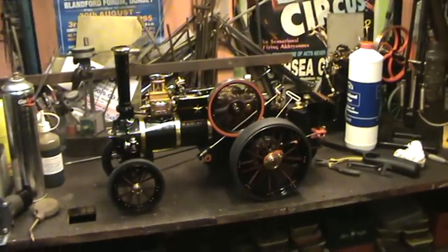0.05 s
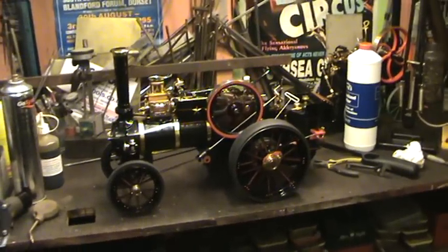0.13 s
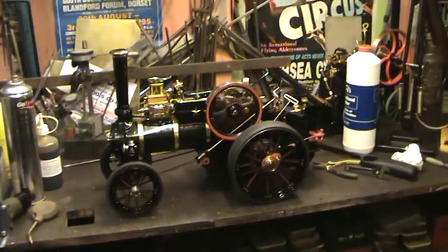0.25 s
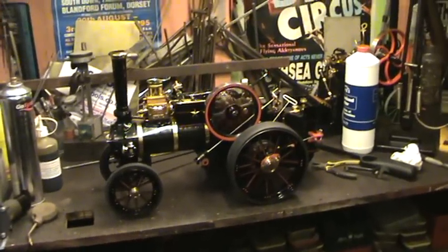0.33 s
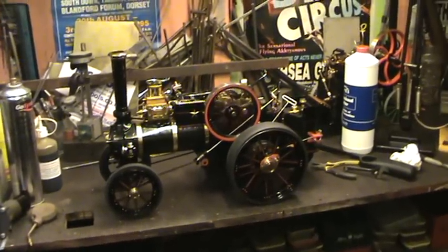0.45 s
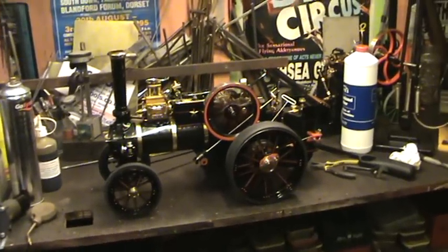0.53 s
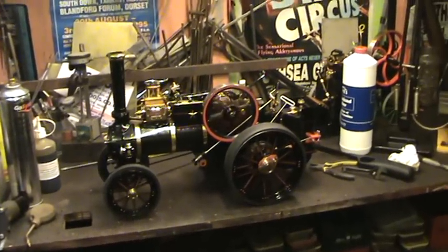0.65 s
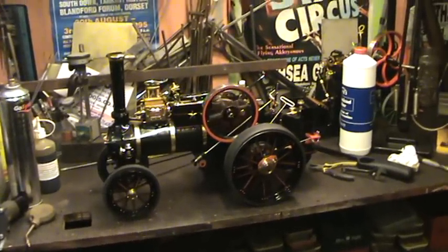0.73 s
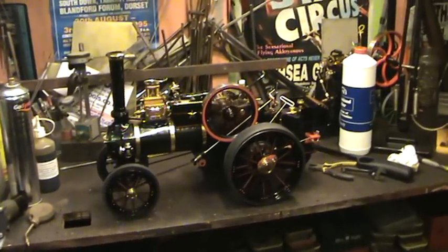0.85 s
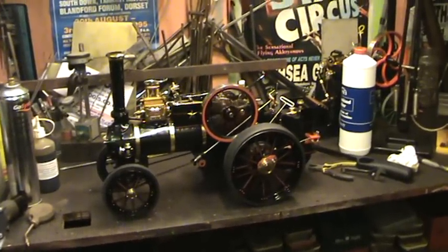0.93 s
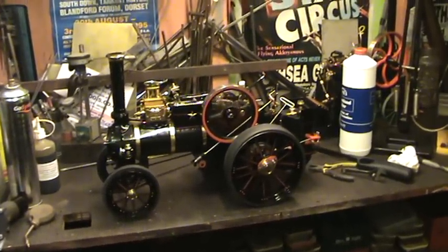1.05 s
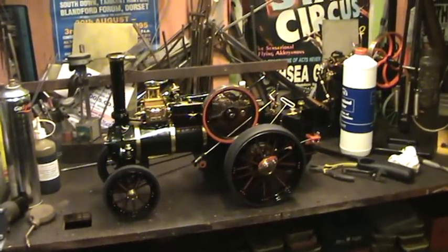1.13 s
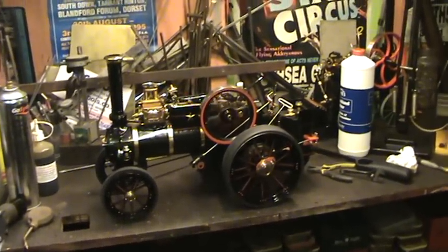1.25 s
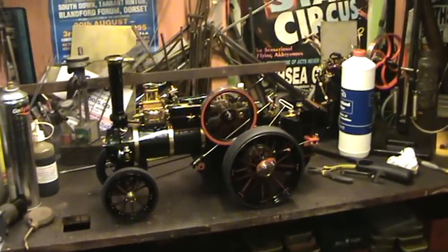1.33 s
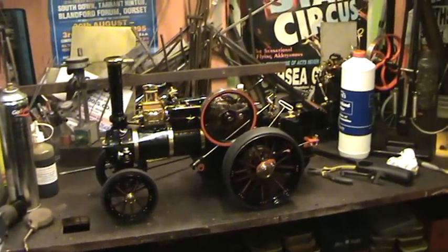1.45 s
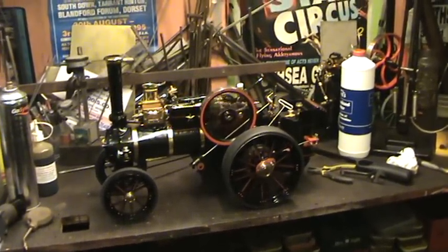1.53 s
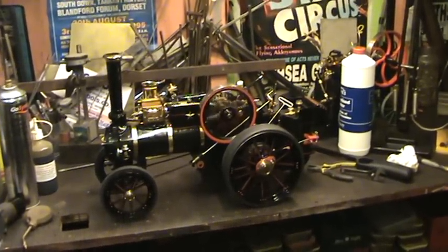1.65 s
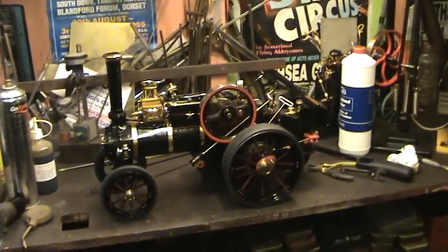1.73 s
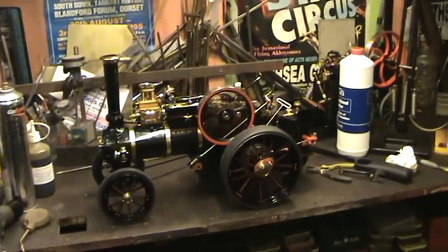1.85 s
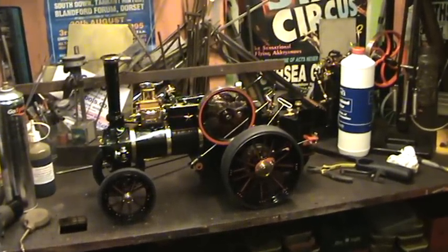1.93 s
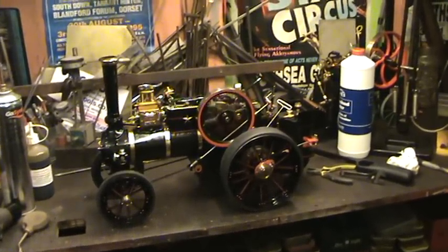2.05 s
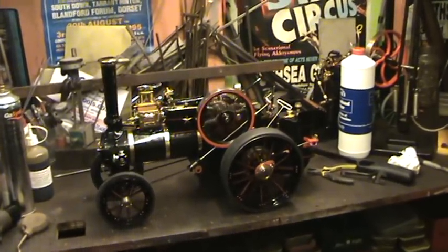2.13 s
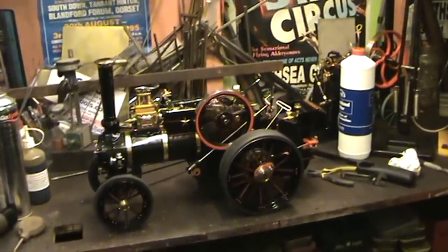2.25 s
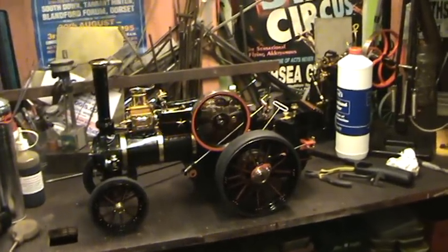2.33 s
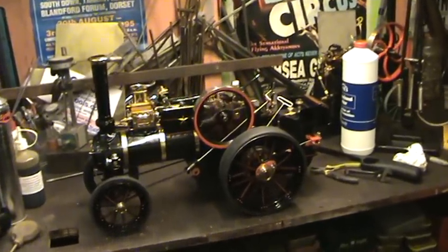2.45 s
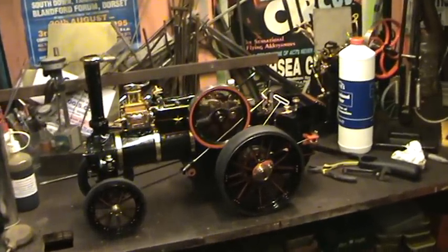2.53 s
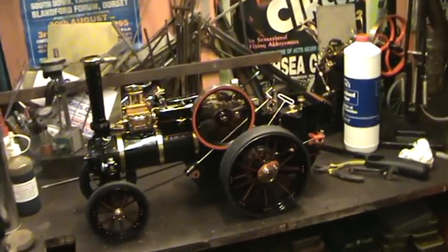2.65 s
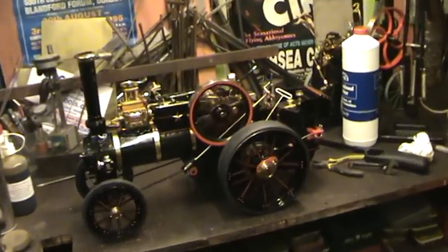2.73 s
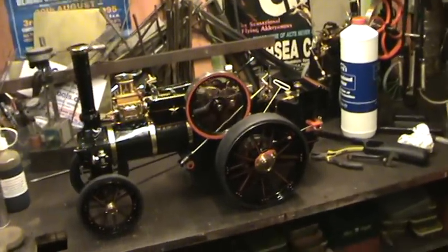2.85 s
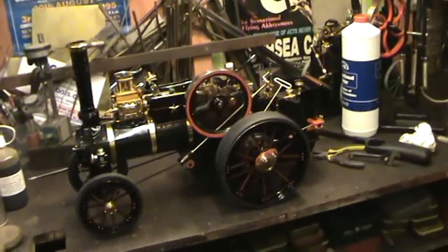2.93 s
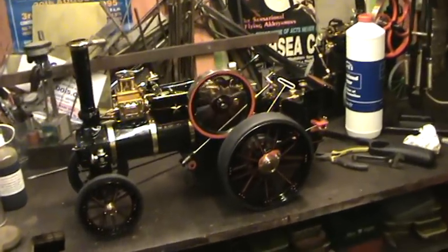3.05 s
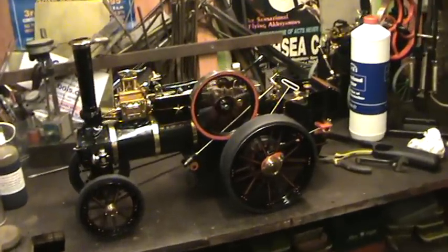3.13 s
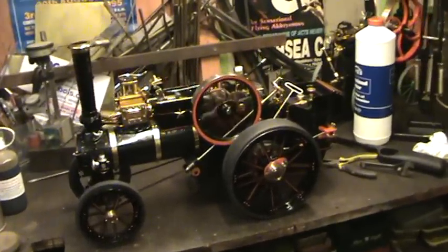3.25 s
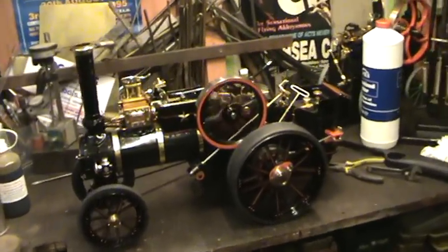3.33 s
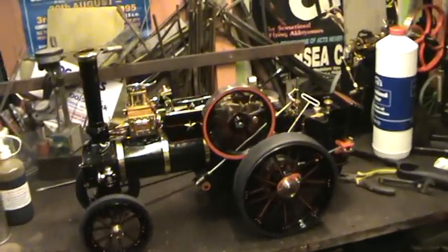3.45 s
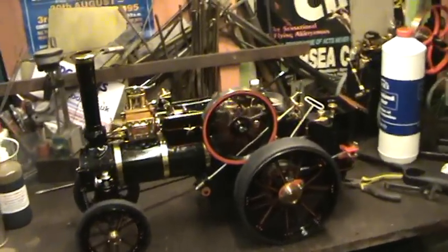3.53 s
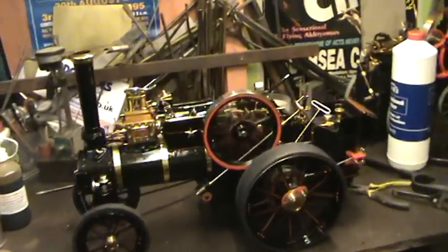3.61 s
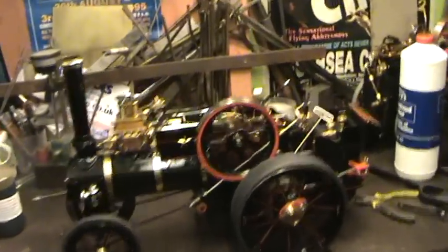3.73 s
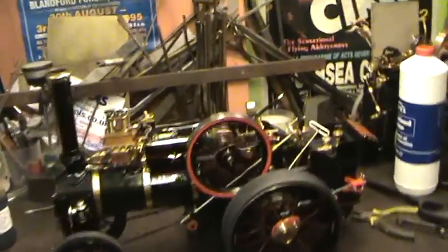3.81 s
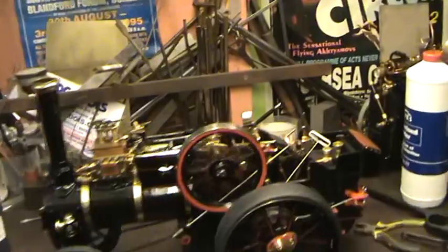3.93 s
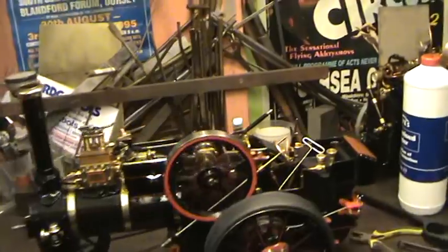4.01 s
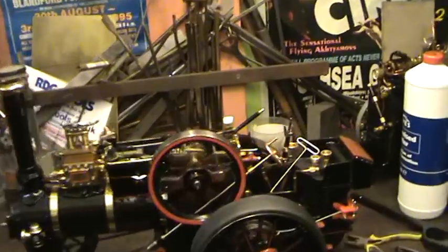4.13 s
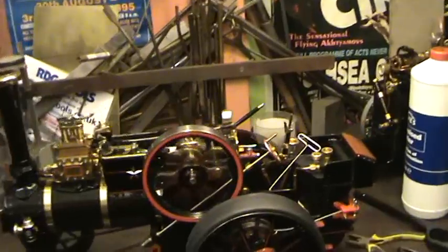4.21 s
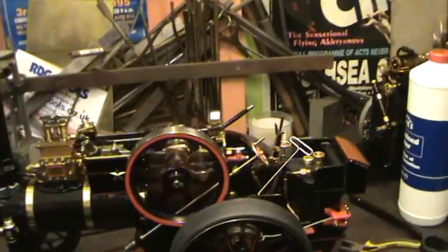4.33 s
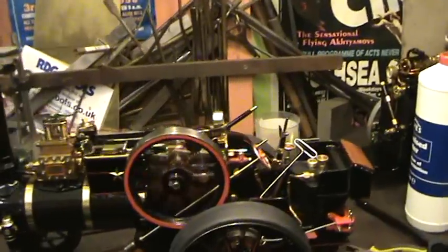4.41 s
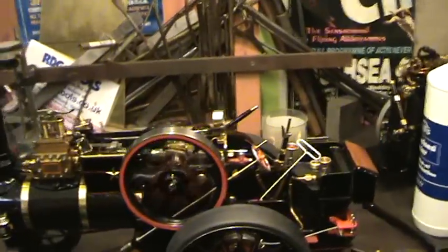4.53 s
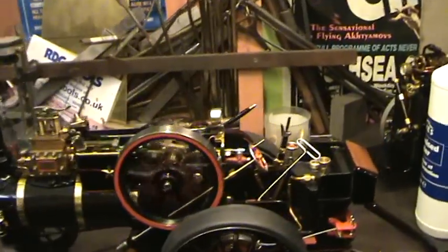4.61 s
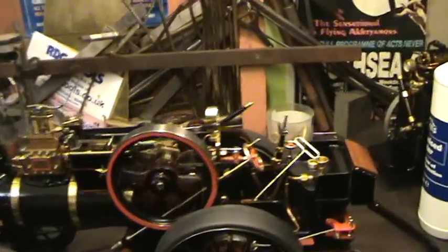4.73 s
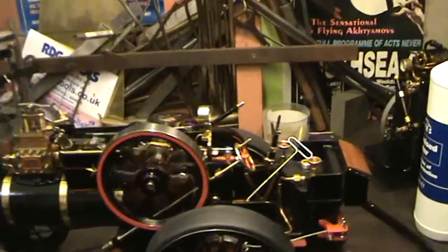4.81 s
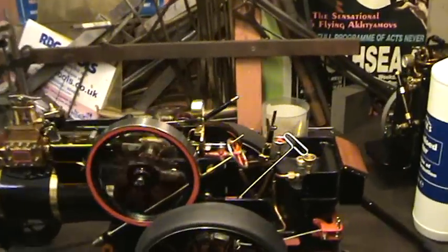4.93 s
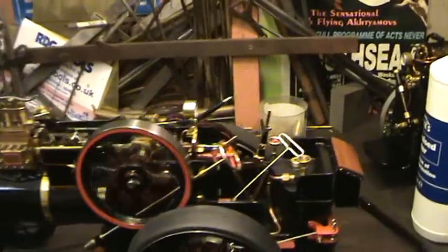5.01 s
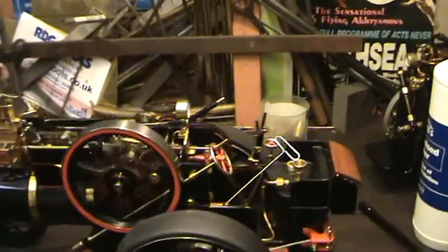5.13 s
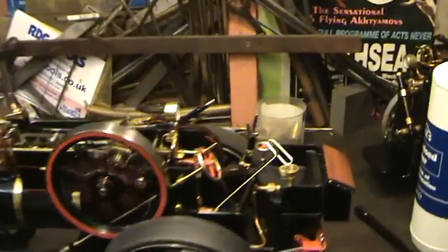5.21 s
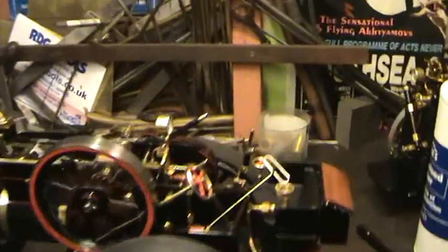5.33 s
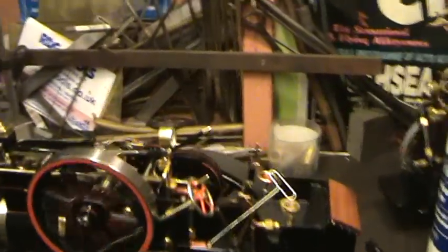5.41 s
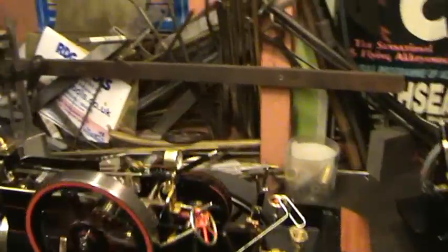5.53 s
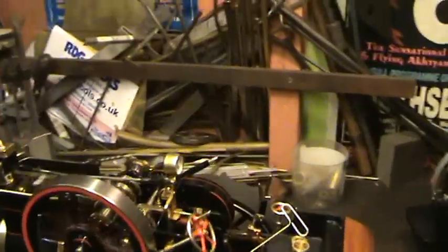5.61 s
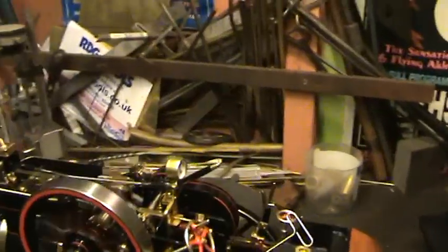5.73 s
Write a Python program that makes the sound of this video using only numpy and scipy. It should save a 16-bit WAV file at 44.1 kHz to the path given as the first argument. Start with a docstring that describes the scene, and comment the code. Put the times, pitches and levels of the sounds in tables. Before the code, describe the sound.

A small model steam engine runs on a shed workbench, chuffing and knocking in a rapid, even beat over a steady hiss.

```python
"""A model steam traction engine ticks over on a shed workbench, about six crank turns a second.
At both stroke ends the rod knocks frame and bench, the engine rocks, and exhaust chuffs up the chimney.
Steam hisses from the boiler fittings and whistles past the rod gland twice a turn, over a low drone.
Later the gland groans, and a faint ring and a thin note in the hiss come and go.
The microphone moves closer: the beat grows louder, drier and more even."""
import sys
import numpy as np
from scipy import signal
from scipy.fft import rfft, irfft
from scipy.io import wavfile

SR = 44100
rng = np.random.default_rng(int(sys.argv[2]) if len(sys.argv) > 2 else 0)


def unload_audio(sound):
    """Save the sound as a 16-bit wav file, at the path given as the first command line argument."""
    columns = np.transpose(np.atleast_2d(sound))
    # keep every value between -1 and 1, then stretch to whole-number steps
    steps = np.round(np.clip(columns, -1, 1) * 32767)
    wavfile.write(sys.argv[1], SR, steps.astype(np.int16))


N = 254456
TIME = np.arange(N) / SR
FREQ = np.fft.rfftfreq(N, 1 / SR)
RETURN_KNOCK_S, OUT_CHUFF_S, RETURN_CHUFF_S = .078, .0195, .096  # after the out-stroke knock

# microphone approach (time [s], nearness [0-1])
NEARNESS = [(0, 0.04), (2.1, 0.1), (3.0, 0.28), (4.0, 0.66), (5.0, .9), (5.77, 1)]
# crank speed (time [s], rate [turns/s])
CRANK_SPEED = [(0.0, 6.136), (0.85, 6.202), (1.1, 6.081), (1.8, 6.255), (2.8, 6.219), (3.3, 6.308),
               (3.8, 6.285), (4.55, 5.989), (5.77, 6.221)]
# stroke strength (time [s], knock [dB], chuff [dB])
STROKE_LEVELS = [(0, -38.5, -36.5), (1.6, -35.5, -34), (2.4, -33, -32), (3.2, -27.5, -30), (4.2, -27, -28),
                 (5.77, -25.5, -27.5)]
# frame resonances (frequency [Hz], width [Hz], gain [dB])
FRAME_MODES = [(267, 60, -2), (310.3, 180, 1), (361.4, 70, -5), (669, 140, -13), (1389, 110, -8.5)]
# steam from the fittings (time [s], hiss [dB], jet [dB])
STEAM_LEVELS = [(0, -28.5, -27.5), (1.65, -25.9, -26), (2.2, -26.5, -26.5), (2.4, -26, -25),
                (2.7, -25, -24.5), (2.9, -25, -26.6), (3.3, -25.5, -22), (3.55, -25, -25.5),
                (3.95, -24.5, -25), (4.6, -24, -26.5), (5.0, -24.5, -25), (5.45, -24.5, -23),
                (5.77, -24.5, -23)]
# broad hiss (frequency [Hz], relative density [dB])
HISS_SPECTRUM = [(300, -14), (1150, -16.5), (1400, -13.5), (1900, -11.5), (3000, -7.5), (3900, -2),
                 (4900, -2.5), (5600, -1.5), (6300, -0.5), (7300, -0.5), (8300, -3), (10000, -3.5),
                 (13000, -19.5)]
# bright jet (frequency [Hz], relative density [dB])
JET_SPECTRUM = [(6000, -22.5), (8200, -12.5), (9250, 2.5), (10100, 1.5), (11000, -4.5), (12000, -12.5),
                (13400, -32), (14400, -37), (15600, -15)]
# narrow ringing peaks in the hiss, strongest from afar (frequency [Hz], width [Hz], gain [dB])
HISS_PEAKS = [(3990, 63, 2), (4420, 60, 5), (5474, 140, 8), (5886, 210, 3.5), (9640, 105, 7.5),
              (9920, 82, -6), (10410, 106, 9.5), (11900, 82, -3)]
# cylinder block leak (frequency [Hz], width [Hz], gain [dB])
BLOCK_MODES = [(3190, 500, -2.5), (3860, 720, 1), (5585, 410, 4.5), (6380, 500, -2)]
# stereo width of the hiss (frequency [Hz], side over mid [dB])
HISS_WIDTH = [(1000, -10.5), (5000, -16), (8000, -16), (9500, -11.5), (10800, -2.5), (12000, 6), (13500, 5),
              (14300, -1), (15200, -25)]
# gland whistle (time [s], level [dB])
GLAND_LEVEL = [(0, -38), (1.3, -37), (2.2, -36.5), (3.0, -33), (3.55, -30.5), (3.9, -40.5), (4.5, -32.5),
               (5.2, -35), (5.77, -39.5)]
# gland leak over one turn (crank phase [turns], level [dB])
GLAND_CYCLE = [(0, -2.5), (.14, -1), (.25, -11.5), (.32, -7.5), (.44, -1.5), (.56, -2), (.68, -14),
               (.82, -11.5), (1, -3.5)]
# upper whistle tones (frequency [Hz], width [Hz], gain [dB])
GLAND_MODES = [(4023, 69, -2), (4440, 52, 0)]
# gland catching and squeaking (peak time [s], length [s], boost [dB])
GLAND_SQUEAKS = [(1.368, 0.049, 6), (3.61, .08, 2), (4.425, 0.055, 5.5), (5.18, .06, 6)]
# low drone (time [s], level [dB])
DRONE_LEVEL = [(0.0, -47), (0.09, -40), (0.46, -54), (0.67, -40.5), (0.96, -62), (1.03, -49), (1.24, -48),
               (1.3, -63), (1.54, -47), (1.85, -62), (2.59, -50), (2.81, -64), (3.23, -49), (3.91, -68),
               (4.06, -50), (5.05, -55), (5.77, -47)]
# chimney resonances (frequency [Hz], width [Hz], gain [dB])
CHIMNEY_MODES = [(668.6, 69, 6), (762.7, 103, 4.5), (867, 110, 3), (1399, 180, 1), (1630, 220, -6.5),
                 (2060, 610, -6.5), (2404, 220, 2)]
# first spit of a chuff (frequency [Hz], width [Hz], gain [dB])
SPIT_MODES = [(1400, 117, -2.5), (1633, 295, -1.5), (2104, 530, -5.5)]
# shed background (frequency [Hz], relative density [dB])
SHED_SPECTRUM = [(20, -20), (60, -4), (100, 3), (180, -2.5), (350, 7.5), (520, -11), (800, 2.5),
                 (1100, -33), (3000, -45)]
# gland groan (peak time [s], length [s], level [dB])
GROAN_SWELLS = [(3.1, 2, -44.5)]
# faint ring (peak time [s], length [s], level [dB])
RING_SWELLS = [(2.57, 0.37, -50), (3.81, .42, -40.5)]
# thin note in the hiss (peak time [s], length [s], level [dB])
SINGING_SWELLS = [(2.62, 0.44, -33), (3.3, .4, -34), (5.2, .3, -33)]
# microphone mismatch (frequency [Hz], left minus right [dB])
MIC_BALANCE = [(120, -0.5), (400, 0.9), (2000, 0.6), (4500, 0.5), (8500, -0.9), (12500, -0.5)]


def undb(db):
    """Decibels to gain."""
    return 10 ** (np.asarray(db) / 20)


def unit(x):
    """Scale to rms 1."""
    return x / np.sqrt(np.mean(x ** 2))


def white():
    """White noise, variance 1."""
    return rng.standard_normal(N)


def curve(rows, column=1):
    """Table column, linear in time."""
    rows = np.array(rows)
    return np.interp(TIME, rows[:, 0], rows[:, column])


def swells(rows):
    """Smooth humps from (peak time [s], length [s], height)."""
    return sum(height * np.cos(np.pi * np.clip((TIME - peak_s) / length_s, -.5, .5)) ** 2
               for peak_s, length_s, height in rows)


def swell_gain(rows):
    """Humps of gain, heights given in dB."""
    return swells([(peak_s, length_s, undb(db)) for peak_s, length_s, db in rows])


def spectrum_db(points):
    """Table levels joined over log frequency."""
    hz, db = np.transpose(points)
    return np.interp(np.log(FREQ + 1), np.log(hz), db)


def equalize(x, gain_db):
    """Zero-phase gain per frequency bin."""
    return irfft(rfft(x) * undb(gain_db), N)


def noise(points):
    """Coloured noise, rms 1."""
    return unit(equalize(white(), spectrum_db(points)))


def ring(x, hz, width_hz, order):
    """Resonators in series, gain 1 at centre; higher orders swell more slowly."""
    section = np.concatenate(signal.iirpeak(hz, hz / width_hz, fs=SR))
    return signal.sosfilt(np.tile(section, (order, 1)), x + 1e-18)


def resonate(x, modes, order=2):
    """Resonances in parallel."""
    return sum(undb(db) * ring(x, hz, width_hz, order) for hz, width_hz, db in modes)


def noise_band(hz, width_hz):
    """Noise through one resonance, rms 1."""
    return unit(ring(white(), hz, width_hz, order=2))


def convolve(x, response):
    """Causal convolution, cut to N."""
    return signal.fftconvolve(x, response)[:N]


def impulses(times_s, db):
    """Impulse train at given levels."""
    train = np.zeros(N)
    np.add.at(train, np.clip((times_s * SR).astype(int), 0, N - 1), undb(db))
    return train


def strokes(times_s, level_db, scatter_db):
    """One impulse per stroke, scattered about a level curve."""
    stroke_db = np.interp(times_s, TIME, level_db) + scatter_db * rng.standard_normal(len(times_s))
    return impulses(times_s, stroke_db)


def knocks(blow, release, near, frame_db=41, bench_db=56, bench_chuff_db=-5):
    """The rod thumps the frame; the bench rings after each knock and chuff. Close up the frame leads."""
    frame = resonate(blow, FRAME_MODES, order=5)  # oil cushions the blow: slow onset
    bench = ring(blow + undb(bench_chuff_db) * release, hz=326.3, width_hz=59.5, order=4)
    return undb(frame_db + 7.5 * near) * frame + undb(bench_db - 11 * near ** 2) * bench


def rocking(turns_s, near, out_db=15.5, return_db=15, lead_s=.009):
    """Each piston reversal rocks the engine on its wheels: a low thud, earlier close up."""
    out_s = turns_s - lead_s * np.interp(turns_s, TIME, near) ** 2
    reversals = impulses(out_s, out_db) + impulses(out_s + RETURN_KNOCK_S, return_db)
    return ring(reversals, hz=121.2, width_hz=46.6, order=3)


def steam(near, hiss_db=.5, peaks_db=-4, block_db=-4):
    """The fittings leak hiss and a bright jet; close up, ringing peaks fade and a block leak joins."""
    hiss_gain, jet_gain = undb(curve(STEAM_LEVELS)), undb(curve(STEAM_LEVELS, column=2))
    peaks = unit(resonate(white(), HISS_PEAKS)) * undb(peaks_db - 12 * near)
    block = unit(resonate(white(), BLOCK_MODES)) * undb(block_db) * np.sqrt(near)
    hiss = undb(hiss_db) * noise(HISS_SPECTRUM)
    rush = hiss_gain * (hiss + block) + jet_gain * noise(JET_SPECTRUM)
    return reflections(rush, near) + hiss_gain * peaks


def reflections(x, near, count=9, first_s=.002, last_s=.016, travel_s=.000902, gain=.17):
    """Tools and walls comb the hiss; the notches slide as the microphone moves."""
    combed = x.copy()
    oversampled = signal.resample_poly(x, 8, 1)
    for place, slope, polarity in rng.uniform(-1, 1, (count, 3)):
        delay_s = first_s + (last_s - first_s) * abs(place) + travel_s * slope * near
        index = ((TIME - delay_s) * 8 * SR).astype(int)
        combed += gain * np.sign(polarity) * oversampled.take(index, mode="wrap")
    return combed / np.sqrt(1 + count * gain ** 2)


def gland(crank_turns, near, sink_hz=45, sputter_db=2, upper_db=-1, hollow_db=-11):
    """Steam squeezes past the piston rod twice a turn: a sputtering whistle, slightly lower close up."""
    upper = undb(upper_db - 9 * near) * unit(resonate(white(), GLAND_MODES))
    tones = noise_band(hz=2684, width_hz=130) + upper
    shift_down = np.exp(-2j * np.pi * np.cumsum(near * sink_hz) / SR)
    whistle = np.real(signal.hilbert(tones) * shift_down)
    hollow = undb(hollow_db) * noise_band(hz=1375, width_hz=150)
    flicker_db = sputter_db * noise_band(hz=5.9, width_hz=17)
    leak_db = np.interp(crank_turns % 1, *np.transpose(GLAND_CYCLE))
    return (whistle + hollow) * undb(leak_db + curve(GLAND_LEVEL) + swells(GLAND_SQUEAKS) + flicker_db)


def drone(crank_turns, waver_db=1.5, waver_hz=5):
    """A wavering low tone at ten times the crank rate."""
    waver = unit(irfft(rfft(white()) * np.exp(-(FREQ / waver_hz) ** 2), N))
    tone = np.sqrt(2) * np.sin(2 * np.pi * 10 * crank_turns)
    return tone * undb(curve(DRONE_LEVEL) + waver_db * waver)


def chuffs(release, near, open_s=.0014, empty_s=.023, pop_db=30, rasp_db=-22, direct_db=-7,
           echo_s=.0085, echo_gain=.36):
    """The valve opens: a soft pressure step and a fading rush of steam sound the chimney."""
    t = TIME[:SR // 6]
    flow = convolve(release, (1 - np.exp(-t / open_s)) * np.exp(-t / empty_s))
    rush = flow * white()
    pop = undb(pop_db) * ring(release, hz=790, width_hz=420, order=3)
    rasp = undb(rasp_db) * ring(rush, hz=3100, width_hz=3000, order=2)
    direct = undb(direct_db) * near * pop  # straight from the cylinder
    puff = resonate(rush + pop, CHIMNEY_MODES) + rasp + direct
    bench_echo = echo_gain * np.interp(TIME - echo_s, TIME, puff, left=0)
    return puff + bench_echo


def spit(release, near, gain_db=15, fade_s=.013):
    """The first steam through the valve gives each chuff a bright edge."""
    burst = convolve(release, np.exp(-TIME[:SR // 6] / fade_s)) * white()
    return undb(gain_db + 2 * near) * resonate(burst, SPIT_MODES)


def shed(x, gap_s=.0058, t60_s=.33):
    """Short tail of a small cluttered room."""
    t = TIME[:SR // 3]
    tail = rng.standard_normal(len(t)) * undb(-60 * t / t60_s) * (t > gap_s)
    return convolve(x, tail / np.sqrt(np.sum(tail ** 2)))


def groan(crank_turns, peak_turn=.66, depth_db=4):
    """A hollow gland note two octaves under the whistle, strongest around the return stroke."""
    pulse = undb(depth_db * np.cos(2 * np.pi * (crank_turns - peak_turn)))
    return noise_band(hz=670, width_hz=30) * pulse * swell_gain(GROAN_SWELLS)


def faint_ring(hz=885):
    """A pure tone that swells and fades twice."""
    return np.sqrt(2) * np.sin(2 * np.pi * hz * TIME) * swell_gain(RING_SWELLS)


def singing():
    """Escaping steam briefly settles on one note."""
    return noise_band(hz=5600, width_hz=220) * swell_gain(SINGING_SWELLS)


def scene(return_knock_db=-5, return_chuff_db=2.5, exhaust_db=11, whistle_db=1,
          wet_db=-7, side_db=-8, floor_db=-51):
    """The crank times knocks, chuffs, whistle and drone under the hiss; mid/side stereo."""
    near = curve(NEARNESS)
    crank_turns = np.cumsum(curve(CRANK_SPEED)) / SR
    turns_s = np.interp(np.arange(int(crank_turns[-1]) + 1), crank_turns, TIME)  # start of each turn
    knock_db, chuff_db = curve(STROKE_LEVELS), curve(STROKE_LEVELS, column=2)
    uneven = 1 - .52 * near  # out and return strokes even out close up
    blow = strokes(turns_s, knock_db, scatter_db=1.3)
    blow += strokes(turns_s + RETURN_KNOCK_S, knock_db + return_knock_db * uneven, scatter_db=1.3)
    release = strokes(turns_s + OUT_CHUFF_S, chuff_db, scatter_db=.8)
    release += strokes(turns_s + RETURN_CHUFF_S, chuff_db + return_chuff_db * uneven, scatter_db=.8)
    engine = knocks(blow, release, near) + rocking(turns_s, near)
    exhaust = undb(exhaust_db) * chuffs(release, near) + spit(release, near)
    whistle = undb(whistle_db) * gland(crank_turns, near)
    room = undb(wet_db - 3 * near) * shed(exhaust + undb(-5) * engine)
    room += undb(floor_db) * noise(SHED_SPECTRUM)
    mid = engine + exhaust + whistle + room + drone(crank_turns) + steam(near)
    mid += faint_ring() + singing() + groan(crank_turns)
    # scatter from the sides, widest in the top of the hiss
    side = undb(side_db) * shed(exhaust + undb(-8) * engine)
    side += equalize(steam(near), spectrum_db(HISS_WIDTH))
    return np.array([mid + side, mid - side])


def record(dry, cutoff_hz=15800):
    """Two microphones of slightly unequal colour, then a steep low-pass."""
    tilt_db = spectrum_db(MIC_BALANCE) / 2
    coloured = equalize(dry, [tilt_db, -tilt_db])
    return signal.sosfilt(signal.ellip(12, .2, 80, cutoff_hz, fs=SR, output="sos"), coloured)


dry = scene()
out = record(dry)
unload_audio(out)
```